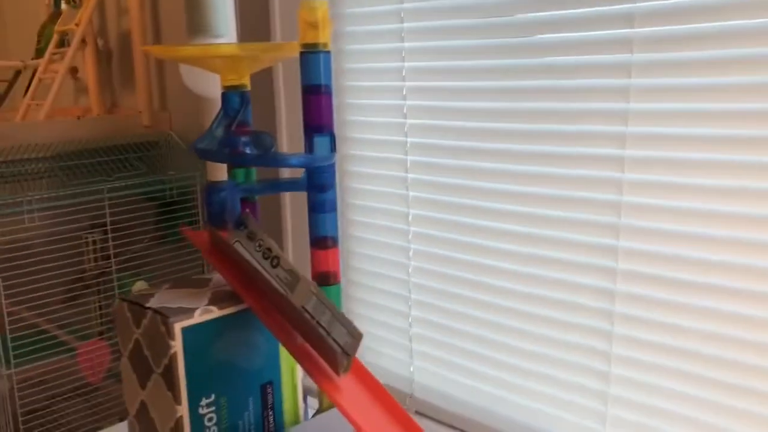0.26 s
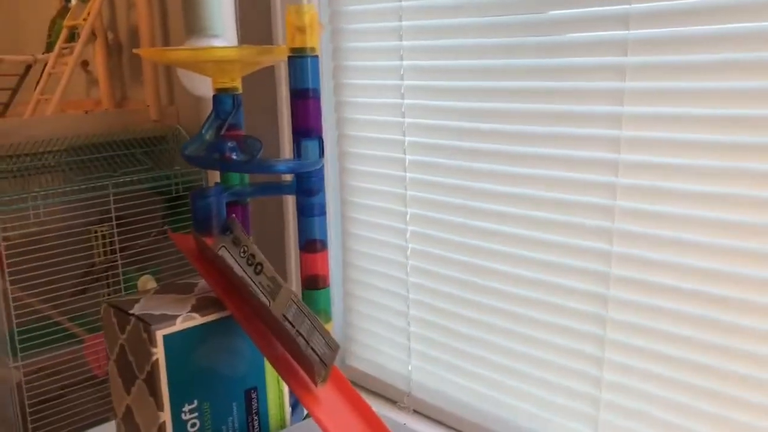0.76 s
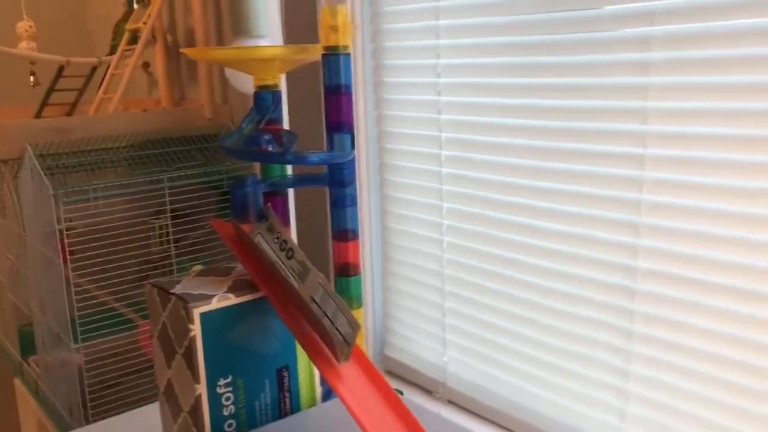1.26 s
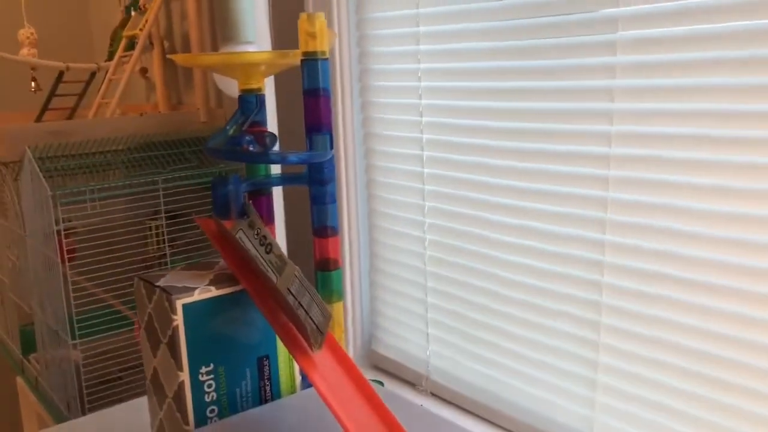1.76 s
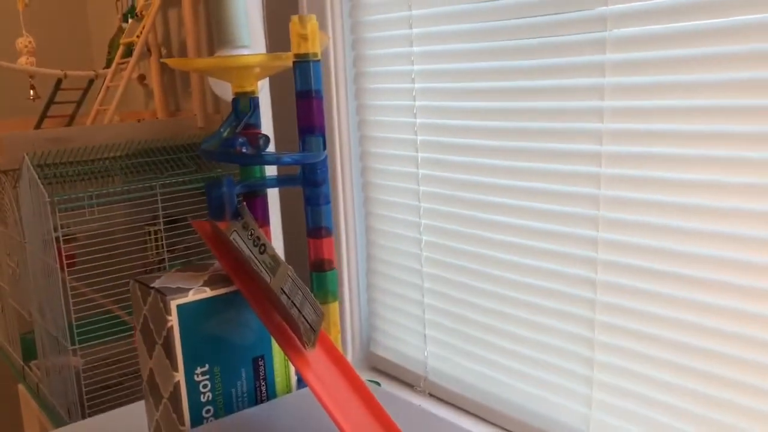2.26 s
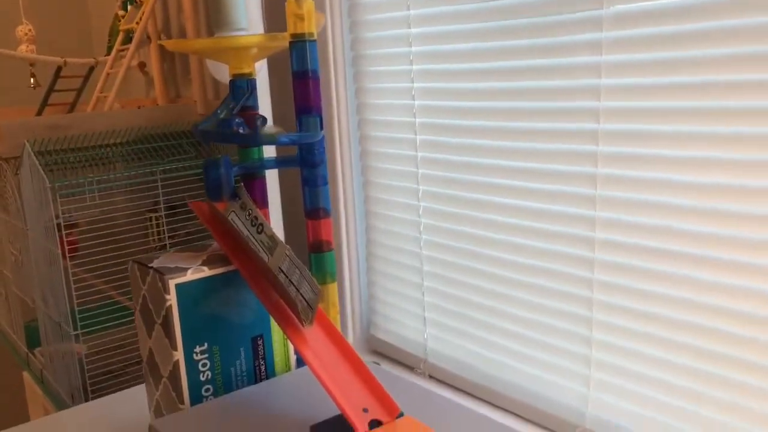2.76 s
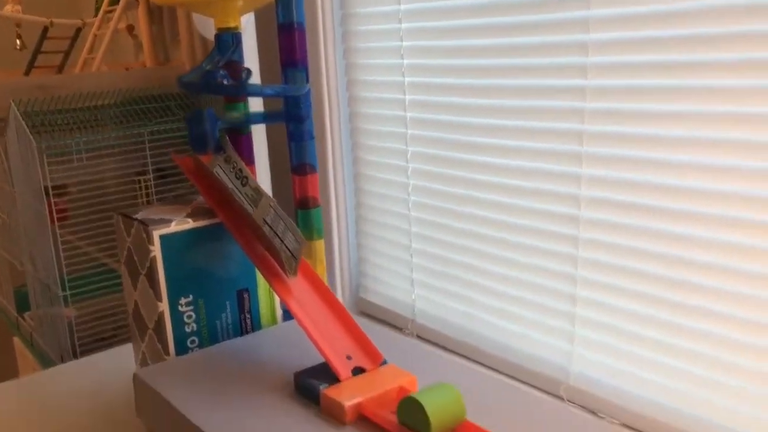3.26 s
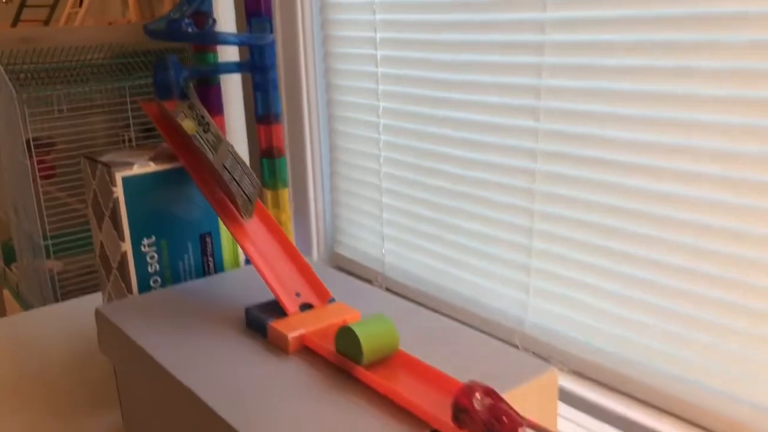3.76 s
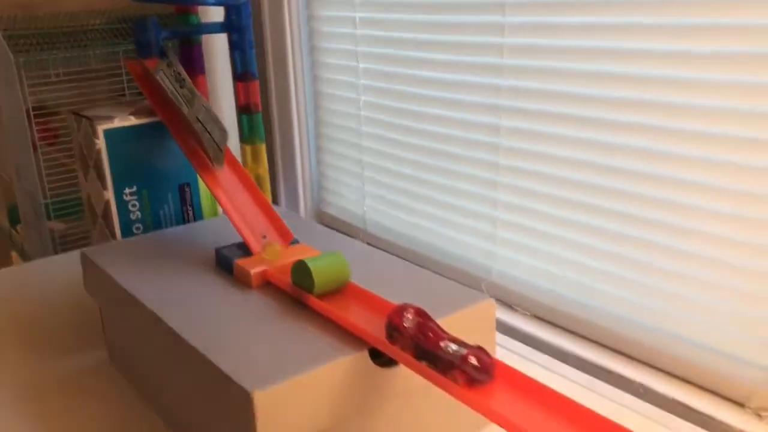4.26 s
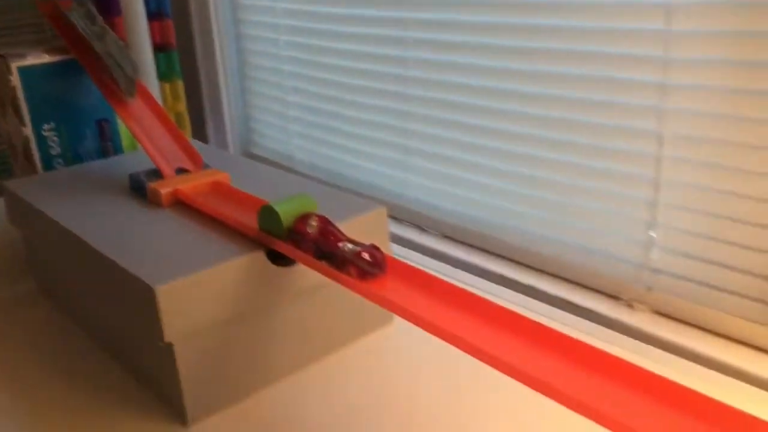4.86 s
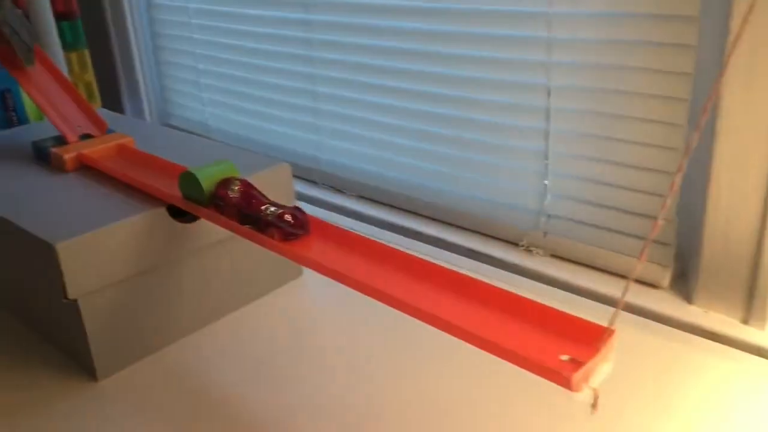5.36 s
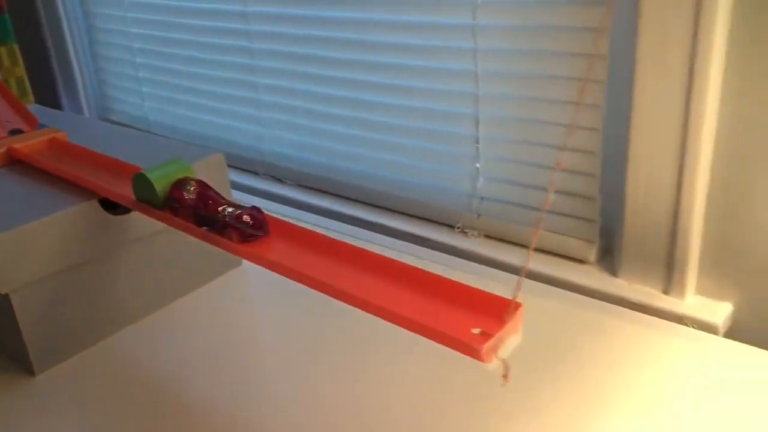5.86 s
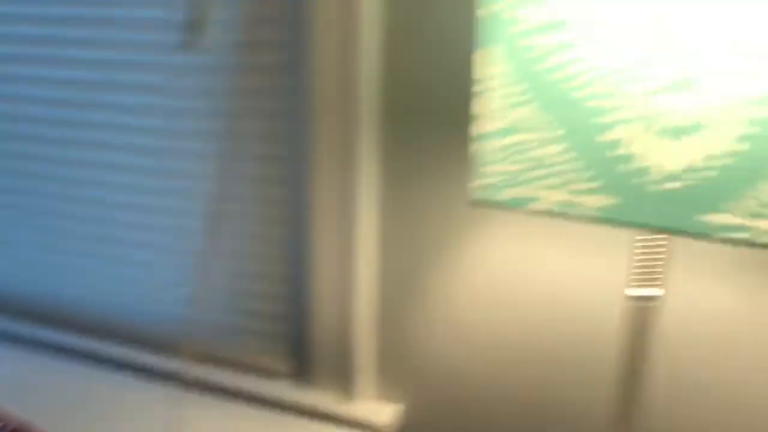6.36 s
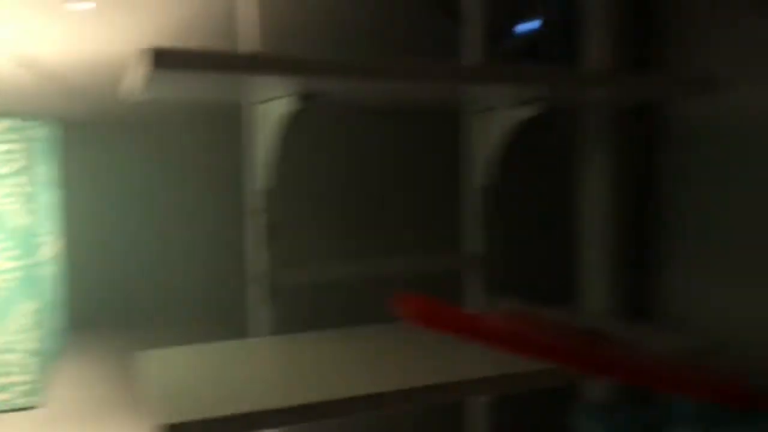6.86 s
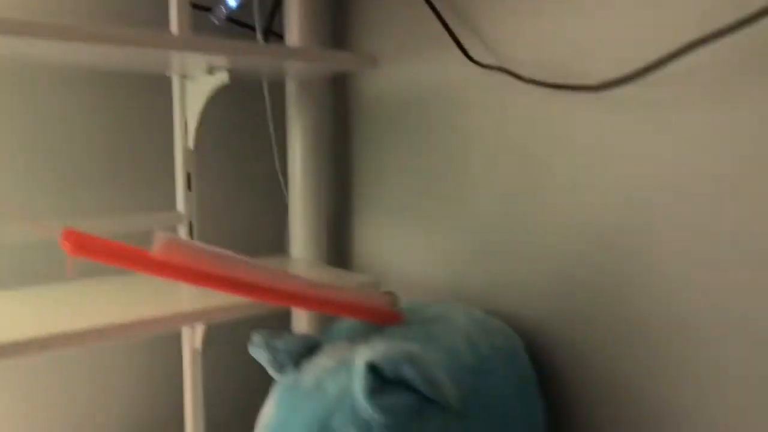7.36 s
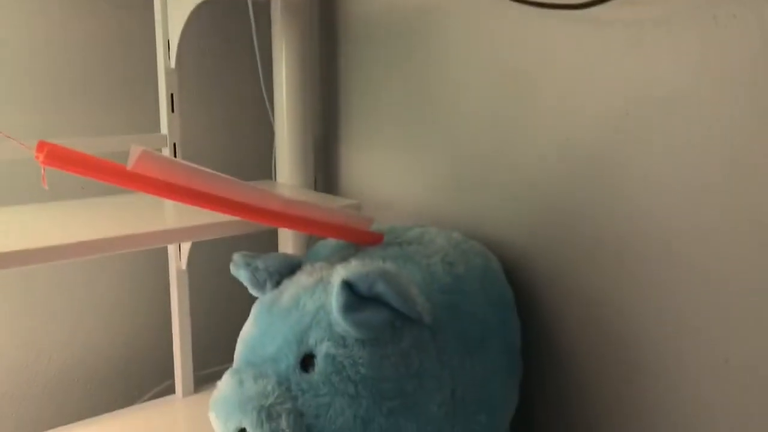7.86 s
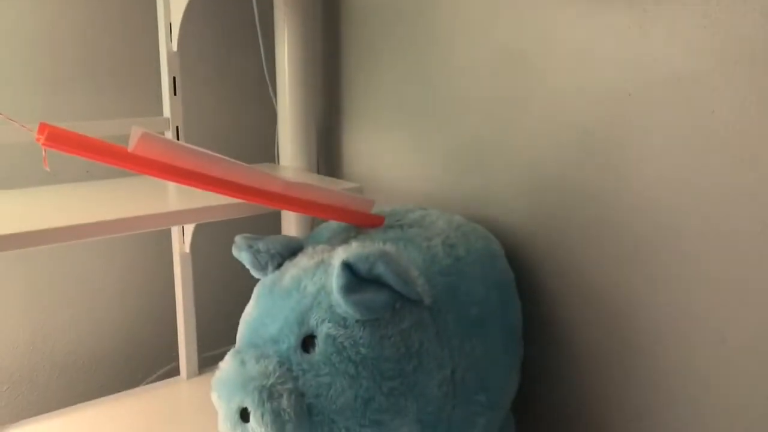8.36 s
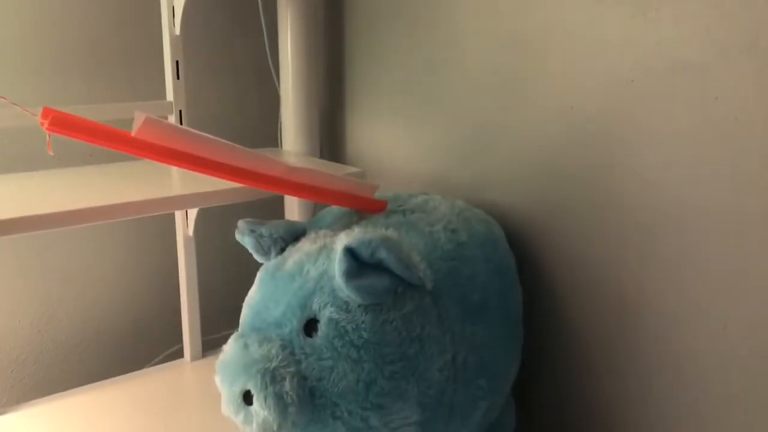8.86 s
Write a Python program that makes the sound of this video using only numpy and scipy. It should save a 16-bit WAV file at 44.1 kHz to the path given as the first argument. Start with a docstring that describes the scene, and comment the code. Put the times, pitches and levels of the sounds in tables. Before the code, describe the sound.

In a small quiet room, a marble rolls round a plastic funnel in soft swelling laps, spins louder and brighter, then clatters down a plastic tower. Knocks follow on a toy track, with a dull roller drumming on a cardboard box. After a near-silent gap, a ticking run builds to a sharp strike; a coin hisses down a chute and bounces loudly in a piggy bank. Phone-like microphone, the tower slightly more roomy.

```python
"""A marble laps a plastic funnel, spins down its throat, rattles through a tower, drops on a toy track and
knocks a roller along a cardboard box; something rolls on and strikes a coin, which slides into a piggy bank.
Blows are decaying noise shaped by body resonances; rolling is a stream of tiny impacts through those bodies.
The coin and the air in the bank ring as decaying sines. A small room adds reflections and a quiet rumble and hiss."""
import sys
import numpy as np
from scipy import signal
from scipy.fft import rfft, irfft
from scipy.io import wavfile
from scipy.ndimage import uniform_filter1d

SR = 44100
rng = np.random.default_rng(int(sys.argv[2]) if len(sys.argv) > 2 else 0)


def dump(signal):
    """Clip the signal to [-1, 1] and save it as 16-bit WAV at the path in sys.argv[1]."""
    limited = np.clip(np.atleast_2d(signal).T, -1, 1)
    pcm = np.round(limited * 32767).astype(np.int16)
    wavfile.write(sys.argv[1], SR, pcm)


N = 401749
T = np.arange(N) / SR

# Resonances of the plastic tower: freq_hz, width_hz, level_db
TOWER_MODES = [(1174, 87, -4), (1800, 160, -2), (2760, 410, -2.5), (3716, 360, 2), (4170, 300, -4),
               (4500, 39, -12), (4940, 93, -9.5), (5460, 140, -11.5), (6500, 160, -18.5), (7190, 81, -13.5)]
# Resonances of the toy track: freq_hz, width_hz, level_db
TRACK_MODES = [(354, 85, -1.5), (1140, 110, -10.5), (1690, 68, -7.5), (2620, 100, -11.5),
               (3320, 1200, -3.5), (4360, 70, -11.5), (5500, 250, -15), (6230, 81, -16)]
# Resonances of the piggy bank's shell: freq_hz, width_hz, level_db
BANK_MODES = [(575, 370, 6), (1180, 94, -12.5), (1770, 48, -9), (2050, 55, -13.5), (2404, 30, -8),
              (2960, 30.5, -1.5), (4140, 55, -8), (8470, 48, -16)]

# In the throat the rolling grows louder and brighter until the marble drops
THROAT_START_S, THROAT_END_S = 1.745, 2.235
THROAT_DB, THROAT_RISE_DB_PER_S, THROAT_BRIGHTEN_DB_PER_S = -51, 19.5, 26.5


def undb(db):
    """Amplitude grows tenfold with every 20 dB."""
    return 10 ** (np.asarray(db) / 20)


def unit(x):
    """Root-mean-square normalisation: scale to rms 1."""
    return x / np.sqrt(np.mean(x ** 2))


def walk(rate):
    """Slow random modulation: levels held 1 / rate seconds and slewed, with a spread near 1."""
    size = int(SR / rate)
    steps = np.repeat(rng.standard_normal(N // size + 1), size)
    return 1.3 * uniform_filter1d(steps, size)[:N]


def colour(x, points, size=4096):
    """Minimum-phase filtering: the folded cepstrum makes a causal response through (Hz, dB) points."""
    hz, db = np.transpose(points)
    grid = np.maximum(np.fft.rfftfreq(size, 1 / SR), 1)
    log_gain = np.log(undb(np.interp(np.log(grid), np.log(hz), db)))
    cepstrum = irfft(log_gain)
    cepstrum[1:size // 2] *= 2
    cepstrum[size // 2 + 1:] = 0
    response = irfft(np.exp(rfft(cepstrum)))
    return signal.fftconvolve(x, response)[:len(x)]


def band_energy(x, lo, hi):
    """Parseval's theorem: the sum of squares of x between two frequencies."""
    hz = np.fft.rfftfreq(len(x), 1 / SR)
    inside = (hz >= lo) & (hz < hi)
    return 2 * np.sum(np.abs(rfft(x)[inside]) ** 2) / len(x)


def resonate(x, modes, plain_db):
    """Modal superposition: a few strong resonances stand above a plain share."""
    out = undb(plain_db) * x
    for hz, width, db in modes:
        b, a = signal.iirpeak(hz, hz / width, SR)
        out = out + undb(db) * signal.lfilter(b, a, x)
    return out


def dense_ring(size, t60, slope, rise_cycles):
    """High modal density: modes merge into noise; t60 holds at 2 kHz, low octaves build and fade slower."""
    t, hz = T[:size], np.maximum(np.fft.rfftfreq(size, 1 / SR), 1)
    noise, out = rfft(rng.standard_normal(size)), 0
    for centre in np.geomspace(62.5, 16000, 9):
        weight = np.clip(1 - np.abs(np.log2(hz / centre)), 0, 1)
        octave = irfft(noise * weight, size)
        decay = np.log(1000) / t60 * (centre / 2000) ** slope
        build = 1 - np.exp(-t * centre / rise_cycles)
        out = out + octave * np.exp(-decay * t) * build
    return out


def blows(hits, contact_db, modes, plain_db, ring_t60, slope, rise_cycles, size=8192):
    """Impact excitation: a square landing adds thud and damps the body, a hard edge adds brightness."""
    # Frequency bands in which a contact is described: low_hz, high_hz
    bands = [(80, 300), (300, 1000), (1000, 3500), (3500, 8000), (8000, 16000)]
    out = np.zeros(N + size)
    for start, db, thud_db, bright_db in hits:
        t60 = ring_t60 * 2 ** (-thud_db / 13)  # 13 dB of extra thud halves the ring
        ring = dense_ring(size, max(t60, .004), slope, rise_cycles)
        ring = resonate(ring, modes, plain_db)
        band_db = np.add(contact_db, [thud_db, thud_db, 0, 0.76 * bright_db, bright_db])
        contact = []
        for (lo, hi), level in zip(bands, band_db):
            # the ring's whole energy counts as if spread over a hundredth of a second
            ring_db = 10 * np.log10(band_energy(ring, lo, hi) * 100 / SR)
            contact.append((np.sqrt(lo * hi), level - ring_db))
        contact.insert(0, (40, contact[0][1] - 18))
        first = int(start * SR)
        out[first:first + size] += undb(db) * colour(ring, contact)
    return out[:N]


def bumps(per_s, spread_db):
    """Surface roughness as shot noise: tiny impacts at random moments, a few much harder than the rest."""
    at = rng.integers(0, N, int(per_s * N / SR))
    hardness_db = spread_db * np.minimum(rng.exponential(size=len(at)), 4)
    return np.bincount(at, rng.choice([-1, 1], len(at)) * undb(hardness_db), N)


def travel(impacts, t60, size=1024):
    """Moving excitation: the contact point moves on, so each short patch rings with its own dense modes."""
    patches = np.pad(impacts, (0, -N % size)).reshape(-1, size)
    rings = rng.standard_normal(patches.shape) * np.exp(-np.log(1000) * T[:size] / t60)
    rings[:, 0] += np.sqrt(np.sum(rings ** 2, axis=1))  # the tick of the contact, as strong as its ring
    sound = irfft(rfft(patches, 2 * size) * rfft(rings, 2 * size))
    within = sound[:, :size].ravel()
    overhang = np.roll(sound[:, size:].ravel(), size)
    return (within + overhang)[:N]


def rolling(spectrum, modes, treble_db, plain_db, bumps_per_s, spread_db, ring_t60):
    """Rolling contact noise: tiny bumps shake the body; a harder contact has a larger share of treble."""
    shaken = travel(bumps(bumps_per_s, spread_db), ring_t60)
    body = colour(resonate(shaken, modes, plain_db), spectrum)
    treble = signal.sosfiltfilt(signal.butter(3, 3000, "high", fs=SR, output="sos"), body)
    share = np.minimum(undb(treble_db), 1.3)
    rest = np.sqrt(np.maximum(1 - share ** 2, .12))
    return rest * unit(body - treble) + share * unit(treble)


def stretches(rows):
    """Contact envelope: rolling or sliding sets in, changes steadily in dB and lets go."""
    attack_s, release_s = 0.029, 0.048
    gains = []
    for start, end, start_db, end_db in rows:
        edges = np.interp(T, [start - attack_s, start, end, end + release_s], [0, 1, 1, 0])
        gains.append(edges * undb(np.interp(T, [start, end], [start_db, end_db])))
    return np.max(gains, axis=0)


def air():
    """Broadband background noise: the quiet rumble and hiss of the room, drifting slightly in level."""
    # Spectrum of the background: freq_hz, level_db
    air_spectrum = [(15, -51.5), (25, -17.5), (49, -6), (157, -6), (175, -13), (212, -7), (354, -12.5),
                    (416, -17), (463, -11), (503, -18.5), (3250, -31.5), (8830, -35), (16000, -40.5)]
    level_db = -67.5 + .6 * walk(1.8)
    return undb(level_db) * unit(colour(rng.standard_normal(N), air_spectrum))


def spin_s(t):
    """Kinematics of the throat: seconds the marble has spent spinning there."""
    return np.clip(t - THROAT_START_S, 0, THROAT_END_S - THROAT_START_S)


def throat_db(t):
    """Exponential growth of amplitude: the level in the throat rises steadily in dB."""
    return THROAT_DB + THROAT_RISE_DB_PER_S * spin_s(t)


def funnel_roll():
    """Amplitude-modulated rolling: it swells once a lap, then grows louder and brighter in the throat."""
    # Laps of the funnel, one swell each: start_s, level_db, hold_s
    laps = [(-0.1, -51, 0.087), (0.179, -50.5, 0.052), (0.478, -50, 0.067), (0.811, -47.5, 0.043),
            (1.085, -51, 0.07), (1.36, -52.5, 0.095), (1.657, -52.5, 0.054)]
    # Spectrum of the rolling: freq_hz, level_db
    funnel_spectrum = [(47, -39.5), (80, -26), (102, -9), (199, -8), (259, -18), (461, 3.5), (527, -2.5),
                       (858, -1), (1460, 2), (2040, -8.5), (3320, -30.5), (4330, -34), (5280, -38),
                       (16000, -58.5)]
    # Resonances of the funnel: freq_hz, width_hz, level_db
    funnel_modes = [(195.5, 23, 3.5), (467, 31, -5.5), (1097, 33, 0), (1442, 48, 1.5), (2160, 41, -31),
                    (2460, 150, -1.5), (3296, 69, 0), (3960, 45, -11.5), (4700, 54, -28.5),
                    (5090, 88, -15.5), (5860, 50, -24.5)]
    coast_db, treble_db, flutter_db = -60.5, -15.5, 1.2  # quiet side of a lap; treble share; unevenness
    lap_attack_s, lap_fall_db_per_s = .025, 88.5
    throat = stretches([(THROAT_START_S, THROAT_END_S, THROAT_DB, throat_db(THROAT_END_S))])
    gain = np.maximum(throat, stretches([(0, THROAT_START_S, coast_db, coast_db)]))
    for start, db, hold_s in laps:
        fall_db = lap_fall_db_per_s * np.maximum(T - start - hold_s, 0)
        swell = np.interp(T, [start - lap_attack_s, start], [0, 1]) * undb(db - fall_db)
        gain = np.maximum(gain, swell)
    roll = rolling(funnel_spectrum, funnel_modes, treble_db=treble_db + THROAT_BRIGHTEN_DB_PER_S * spin_s(T),
                   plain_db=-5, bumps_per_s=1100, spread_db=3.0, ring_t60=0.016)
    rumble_spectrum = [(60, -34), (115, -5), (150, -7.5), (200, 3.5), (260, -14.5), (700, -44)]
    rumble = undb(-12) * unit(colour(bumps(per_s=1200, spread_db=3.0), rumble_spectrum))
    return gain * undb(flutter_db * walk(30)) * roll + throat * rumble


def funnel_taps():
    """Impact excitation: the marble taps lightly on the funnel wall."""
    # Light taps: start_s, level_db, brightness_db
    tap_rows = [(0.195, -47, 2), (0.3364, -50.5, -15), (0.4801, -46.5, -2), (0.8195, -36, 3),
                (1.0687, -50, -8), (1.168, -52.5, -6), (1.357, -44.5, -6), (1.4198, -48.5, 1),
                (1.6572, -46.5, -7), (1.724, -46, -4)]
    # Contact spectrum of a tap, one level_db in each band of blows()
    tap_contact = [-13.5, -14.5, 0, -16.5, -30.5]
    # Resonances of the funnel: freq_hz, width_hz, level_db
    wall_modes = [(195.5, 23, 3.5), (467, 31, -5.5), (1097, 33, 0), (1442, 48, 1.5), (2160, 41, -31),
                  (2460, 150, -1.5), (3296, 69, 0), (3960, 45, -11.5), (4700, 54, -28.5), (5090, 88, -15.5),
                  (5860, 50, -24.5)]
    hits = [(s, db, 0, bright_db) for s, db, bright_db in tap_rows]
    return blows(hits, tap_contact, wall_modes, plain_db=-9, ring_t60=0.039, slope=0.33, rise_cycles=2.7)


def tower_blows(hits):
    """Modal impact response: the marble strikes the plastic tower, which sways with a low hum."""
    # Contact spectrum of a tower blow, one level_db in each band of blows()
    tower_contact = [-18, -13.5, 0.5, -4, -13]
    # Slow bending modes of the whole tower: freq_hz, width_hz, level_db
    sway_modes = [(102, 26, 0), (126, 19, -8)]
    knocks = blows(hits, tower_contact, TOWER_MODES, plain_db=-3, ring_t60=.038, slope=0.31, rise_cycles=3.2)
    return resonate(knocks, sway_modes, plain_db=-0.5)


def throat_knocks():
    """Impact excitation: knocks against the throat follow the rolling's rise in level and brightness."""
    # Moments of the knocks: start_s
    knock_times = [1.8308, 1.8877, 1.9272, 1.988, 2.06, 2.0847]
    hits = []
    for s in knock_times:
        bright_db = -11.5 + THROAT_BRIGHTEN_DB_PER_S * spin_s(s)
        hits.append((s, throat_db(s) + 8, -3, bright_db))  # 8 dB above the rolling level, 3 dB less thud
    return tower_blows(hits)


def chatter():
    """Intermittent contact: just before it drops, the marble skips against the wall of its channel."""
    wall_peaks = [(3337, 700, -0.5), (4200, 700, -2), (5670, 1600, -1.0)]
    skips = resonate(travel(bumps(per_s=330, spread_db=0.0), t60=.008), wall_peaks, plain_db=-11.5)
    return unit(skips) * stretches([(2.08, THROAT_END_S, -47.5, -45.5)])


def tower_drops():
    """Impact excitation: the marble drops from level to level in the tower."""
    # Blows in the tower: start_s, level_db, thud_db, brightness_db
    drop_hits = [(2.2423, -21, -2, -4.5), (2.2776, -38, 2, 6.5), (2.2958, -24.5, -5, -5),
                 (2.3267, -34, 2, -3.5), (2.4797, -35.5, 0.5, -8.5), (2.9037, -22.5, 0.5, 6.5),
                 (2.9282, -27.5, -2, -5.5), (2.9688, -22, 1.5, 1), (3.0019, -33.5, 0, 4.5),
                 (3.0402, -29, -2, -1), (3.456, -40, -7.5, -9), (3.498, -30, 3, 12), (3.5413, -40, -2, 8),
                 (3.5553, -43, -3.5, 9), (3.5726, -44, 0, 7)]
    return tower_blows(drop_hits)


def spirals():
    """Rolling contact noise: the marble runs round the spirals between its drops."""
    # Stretches of rolling: start_s, end_s, start_db, end_db
    spiral_rows = [(2.37, 2.44, -56, -60), (2.5, 2.885, -49, -47), (3.12, 3.46, -56, -54.5)]
    # Spectrum of the rolling: freq_hz, level_db
    spiral_spectrum = [(41, -50.5), (70, -31.5), (124, -1.5), (182, -9.5), (360, -12), (494, 0.5),
                       (664, -9), (1020, 0), (1370, -10), (1730, -4.5), (3110, -20), (4380, -26),
                       (16000, -49)]
    roll = rolling(spiral_spectrum, TOWER_MODES, treble_db=-13, plain_db=7,
                   bumps_per_s=900, spread_db=3.0, ring_t60=0.03)
    return stretches(spiral_rows) * roll


def ramp():
    """Rolling contact noise: very dense, even bumps as the marble goes down the ramp."""
    # Stretches of rolling: start_s, end_s, start_db, end_db
    ramp_rows = [(3.7, 3.89, -68, -60.5), (3.9, 4.09, -61, -61)]
    # Spectrum of the rolling: freq_hz, level_db
    ramp_spectrum = [(47, -45), (80, -8), (119, -7.5), (395, -2.5), (441, 0), (1000, -7.5), (1170, -2.5),
                     (2080, -10.5), (3790, -14), (16000, -33.5)]
    roll = rolling(ramp_spectrum, TRACK_MODES, treble_db=-6.5, plain_db=8,
                   bumps_per_s=7100, spread_db=1.1, ring_t60=.018)
    return stretches(ramp_rows) * roll


def track_knocks():
    """Modal impact response: knocks ring the resonances of the toy track."""
    # Blows on the track: start_s, level_db, thud_db, brightness_db
    track_hits = [(4.1687, -33.5, 4, 6.5), (4.2261, -21, 1, -6), (4.2817, -22.5, -5, 2.5),
                  (4.3327, -35.5, 0, -2), (4.5097, -42.5, 4, -7), (4.6916, -36, -15, 6),
                  (4.7183, -44.5, 3, -4), (5.0318, -56, -2, -9), (5.161, -67.5, -2, -7),
                  (5.3003, -68.5, 9, -3), (5.9715, -54.5, -8, -23), (6.0032, -54.5, 0, -10),
                  (6.0714, -46.5, -0.5, -16), (6.0798, -46.5, 5.5, -8), (6.6242, -30.5, -7, -6),
                  (6.7727, -45, -11, -3), (7.0584, -50.5, -12, 11), (7.078, -53.5, -10.5, 7),
                  (7.262, -62, -6, 10), (9.0261, -65.5, 0.5, 11.5)]
    # Contact spectrum of a track blow, one level_db in each band of blows()
    track_contact = [-9.5, -2.5, 0, -4.5, -11.5]
    return blows(track_hits, track_contact, TRACK_MODES, plain_db=-2.5, ring_t60=.034, slope=.45, rise_cycles=0.92)


def roller():
    """Rolling contact noise: the roller drums on the hollow cardboard box, mostly in the bass."""
    # Stretches of rolling: start_s, end_s, start_db, end_db
    roller_rows = [(4.43, 4.68, -50, -55.5), (4.7, 4.9, -49, -74.5)]
    # Spectrum of the drumming: freq_hz, level_db
    roller_spectrum = [(47, -42), (80, -18), (232, 4), (404, -2.5), (527, -15.5), (896, -8), (980, -13),
                       (1090, -22), (1860, -26), (2130, -28), (2840, -34), (16000, -66)]
    roll = rolling(roller_spectrum, TRACK_MODES, treble_db=-21, plain_db=17,
                   bumps_per_s=1300, spread_db=0.8, ring_t60=0.025)
    return stretches(roller_rows) * roll


def ticking_run():
    """Rolling contact noise with sparse impacts: a ticking run that grows louder."""
    # Stretch of rolling: start_s, end_s, start_db, end_db
    run_rows = [(6.11, 6.565, -56, -48.5)]
    # Spectrum of the rolling: freq_hz, level_db
    run_spectrum = [(47, -34.5), (80, -1), (119, 0.5), (156, -12.5), (208, 0.5), (361, -8), (451, -1),
                    (563, -14.5), (615, -4.5), (1000, -12), (1490, -11), (2540, -11.5), (3790, -24),
                    (5640, -26), (16000, -44.5)]
    # Resonances heard in the run: freq_hz, width_hz, level_db
    run_modes = [(1516, 200, -6.5), (2330, 170, -6.5), (2600, 170, 0.5), (5330, 393, -6.5),
                 (9600, 420, -1.5)]
    # Resonances heard in the ticks: freq_hz, width_hz, level_db
    tick_modes = [(9600, 270, -6), (9100, 300, -7), (6920, 392, -9.5), (5300, 520, -4.5)]
    run = rolling(run_spectrum, run_modes, treble_db=-10.5, plain_db=-2.5,
                  bumps_per_s=2600, spread_db=1.1, ring_t60=.007)
    ticks = resonate(travel(bumps(per_s=42, spread_db=1.0), t60=0.00803), tick_modes, plain_db=-23.0)
    return stretches(run_rows) * (run + undb(-15.5) * unit(ticks))


def whirr():
    """Dense shot noise: thousands of bumps a second merge into a whirr centred near 2.7 kHz."""
    # Stretches of whirring: start_s, end_s, start_db, end_db
    whirr_rows = [(6.2, 6.31, -63, -58), (6.335, 6.565, -52.5, -48.5)]
    whirr_spectrum = [(300, -27), (1400, -7.5), (2300, -1.5), (2750, 0),
                      (3300, -13.5), (5400, -18.5), (14000, -35.5)]
    grain = travel(bumps(per_s=5200, spread_db=1.8), t60=0.0061)
    return stretches(whirr_rows) * unit(colour(grain, whirr_spectrum))


def coin_strike():
    """Hard impact: a sharp, bright strike launches the coin."""
    # The blow: start_s, level_db, thud_db, brightness_db
    strike_hits = [(6.575, -30, 0.5, 0)]
    # Contact spectrum of the strike, one level_db in each band of blows()
    strike_contact = [-13, -15, -1.5, 12, 12]
    # Resonances heard in the strike: freq_hz, width_hz, level_db
    strike_modes = [(2700, 440, -2), (3855, 160, -1), (6600, 350, -6.5), (6780, 170, -6.5),
                    (7930, 290, 3.5), (8000, 350, -5), (14950, 290, -2.5)]
    return blows(strike_hits, strike_contact, strike_modes, plain_db=-8,
                 ring_t60=0.037, slope=0.301, rise_cycles=2.93)


def coin_slide():
    """Sliding friction noise: the coin hisses down the chute, rich in treble."""
    # Stretches of sliding: start_s, end_s, start_db, end_db
    slide_rows = [(6.68, 6.91, -59, -52.5), (6.965, 7.03, -58, -53), (7.062, 7.145, -52, -54),
                  (7.283, 7.36, -53, -48)]
    # Spectrum of the hiss: freq_hz, level_db
    slide_spectrum = [(59, -24.5), (100, -3.5), (302, -15.5), (381, -15.5), (721, -7.5), (1280, -8),
                      (1480, -12.5), (1680, -4.5), (1870, -6.5), (4980, 0.5), (9020, -5), (16000, -6)]
    # Resonances of the chute: freq_hz, width_hz, level_db
    chute_modes = [(1838, 90, -2), (2670, 130, 2.5), (3650, 144, -1), (5085, 150, 0), (6560, 250, -0.5),
                   (7400, 220, -0.5)]
    slide = rolling(slide_spectrum, chute_modes, treble_db=0.1, plain_db=7.5,
                    bumps_per_s=3000, spread_db=1.7, ring_t60=.025)
    return stretches(slide_rows) * slide


def slot_rattle():
    """Repeated impacts: the coin rattles at the slot of the bank."""
    # Rattling contacts: start_s, level_db
    rattle_rows = [(7.3684, -45.5), (7.3752, -41), (7.384, -38), (7.405, -42), (7.422, -44.5), (7.43, -41)]
    # Contact spectrum at the slot, one level_db in each band of blows()
    slot_contact = [-18.5, -8, 0, 3, -10]
    hits = [(s, db, 0, 0) for s, db in rattle_rows]
    return blows(hits, slot_contact, BANK_MODES, plain_db=-1.5, ring_t60=.03, slope=0.15, rise_cycles=2.1)


def coin_ring():
    """Flexural modes in close pairs beat; each contact stops the last ring, and tumbling makes it throb."""
    # Contacts that set the coin ringing: start_s, lower_modes_db, upper_modes_db
    clinks = [(7.432, -72, -53), (7.535, -72, -36), (7.675, -60, -31), (7.756, -43.5, -27),
              (7.86, -48.5, -40), (7.897, -50, -27)]
    # The coin's bending modes: freq_hz, level_db, t60_s
    coin_modes = [(9360, 4.5, .46), (9372, -11.5, .4), (15379, -2, .19), (15441, -7, .16),
                  (15170, -12.5, .12)]
    out = np.zeros(N)
    edges = [int(row[0] * SR) for row in clinks] + [N]
    for (_, lower_db, upper_db), first, last in zip(clinks, edges, edges[1:]):
        t = T[:last - first]
        for hz, mode_db, t60 in coin_modes:
            db = mode_db + (lower_db if hz < SR / 4 else upper_db)
            out[first:last] += undb(db) * np.exp(-np.log(1000) * t / t60) * np.sin(2 * np.pi * hz * t)
    return out * undb(1.7 * walk(70))


def bank_bounces():
    """Modal impact response: the coin bounces inside the bank and rings its shell."""
    # Bounces: start_s, level_db, thud_db, brightness_db
    bounce_hits = [(7.5344, -13.5, 1.5, -4), (7.6646, -22.5, 4, -3), (7.672, -27.5, 6, 6),
                   (7.6813, -21.5, 2.5, -7), (7.7279, -28.5, -5, -4), (7.7561, -20.5, -10, 0),
                   (7.897, -21, -12, -4.5), (7.9542, -35.5, -6, 0)]
    # Contact spectrum of a bounce, one level_db in each band of blows()
    bounce_contact = [-18.5, -7.5, -0.5, -7, -15.5]
    return blows(bounce_hits, bounce_contact, BANK_MODES, plain_db=-0.5,
                 ring_t60=0.029, slope=0.16, rise_cycles=1.9)


def bank_hum():
    """Cavity resonance: the air inside the bank swings for a moment after each heavy landing."""
    # Landings that set the air humming: start_s, level_db
    thumps = [(7.535, -41.5), (7.756, -38), (7.897, -44.5)]
    # Modes of the enclosed air: freq_hz, level_db, t60_s
    air_modes = [(88, -7, 0.36), (104, 0.5, 0.34), (158.5, 1, 0.28)]
    out = np.zeros(N)
    for start, db in thumps:
        first = int(start * SR)
        t = T[:N - first]
        build = 1 - np.exp(-t / 0.0063)
        for hz, mode_db, t60 in air_modes:
            decay = np.exp(-np.log(1000) * t / t60)
            out[first:] += undb(db + mode_db) * build * decay * np.sin(2 * np.pi * hz * t)
    return out


def settle():
    """Intermittent contact: between its last bounces the coin jiggles against the bottom of the bank."""
    # Stretches of jiggling: start_s, end_s, start_db, end_db
    settle_rows = [(7.775, 7.81, -41, -43), (7.83, 7.955, -50, -48)]
    settle_spectrum = [(150, -20), (700, -7.5), (2300, 2), (5000, -6.5), (14000, -24.5)]
    jiggle = resonate(travel(bumps(per_s=180, spread_db=0.0), t60=0.021), BANK_MODES, plain_db=0.5)
    return stretches(settle_rows) * unit(colour(jiggle, settle_spectrum))


def room(x, wet_db, t60, slope, build_s):
    """Reverberation: reflections thicken over the first moments, and the room's low modes hum on."""
    # Low standing waves of the room: freq_hz, width_hz, level_db
    room_modes = [(117.4, 10, 14), (152, 12, 3.2), (204, 15, 5.6), (330, 13, 1.6)]
    tail = dense_ring(size=32768, t60=t60, slope=slope, rise_cycles=1.5)
    tail = tail * (1 - np.exp(-(T[:len(tail)] / build_s) ** 2))
    tail = resonate(tail / np.sqrt(np.sum(tail ** 2)), room_modes, plain_db=-1.0)
    return x + undb(wet_db) * signal.fftconvolve(x, tail)[:N]


def scene():
    """Direct-to-reverberant ratio: the tower stands further off, so it carries more of the room."""
    marble = funnel_roll() + funnel_taps() + throat_knocks() + chatter() + tower_drops() + spirals() + ramp()
    track = track_knocks() + roller() + ticking_run() + whirr()
    coin = coin_strike() + coin_slide() + slot_rattle() + bank_bounces() + bank_hum() + settle()
    far = room(marble, wet_db=-8.5, t60=0.31, slope=0.27, build_s=0.0058)
    middle = room(track, wet_db=-10.5, t60=.29, slope=0.12, build_s=0.006)
    near = room(coin, wet_db=-11, t60=0.31, slope=0.15, build_s=0.0073)
    return (far + middle + near + coin_ring() + air())[None]


def record(dry):
    """Band limiting: a phone's steep low-pass cuts the top above 15.9 kHz."""
    low_pass = signal.ellip(10, .2, 70, 15900, fs=SR, output="sos")
    return signal.sosfilt(low_pass, dry)


dry = scene()
out = record(dry)
dump(out)
```